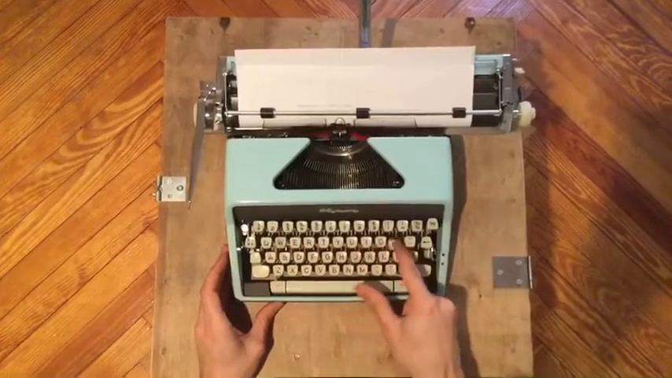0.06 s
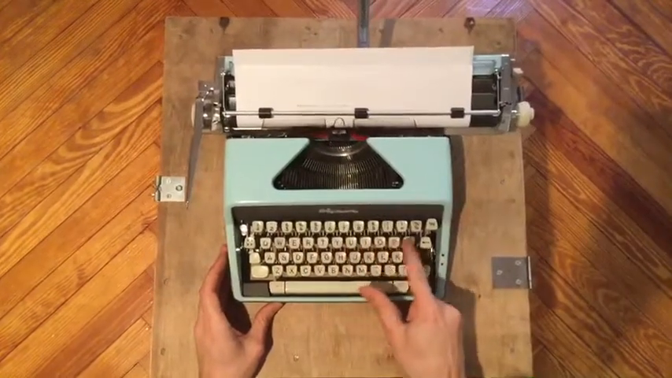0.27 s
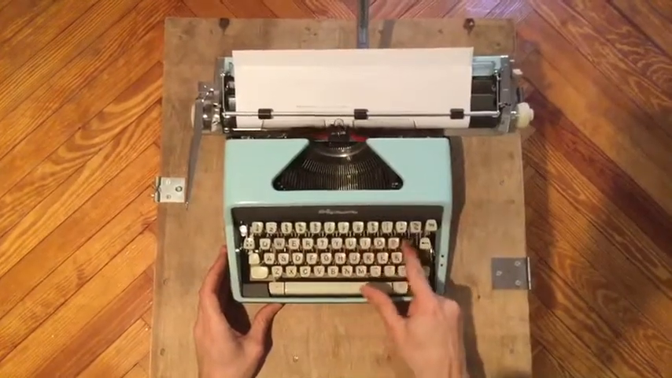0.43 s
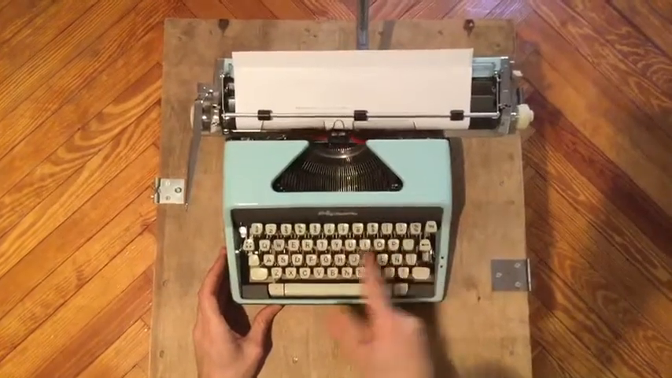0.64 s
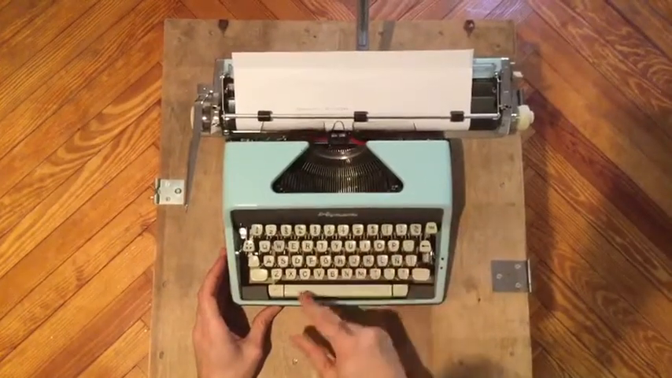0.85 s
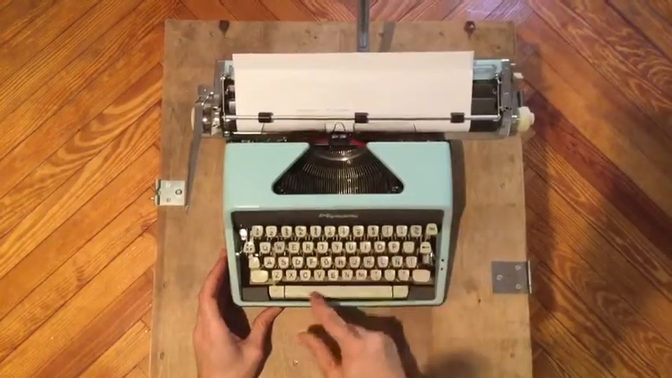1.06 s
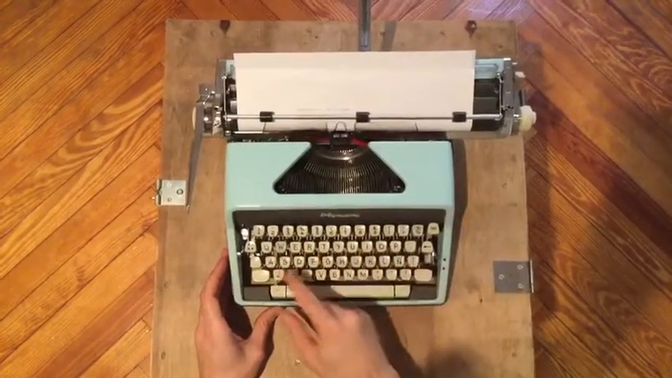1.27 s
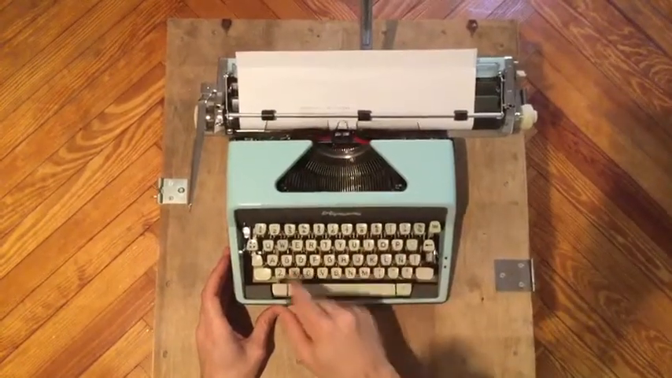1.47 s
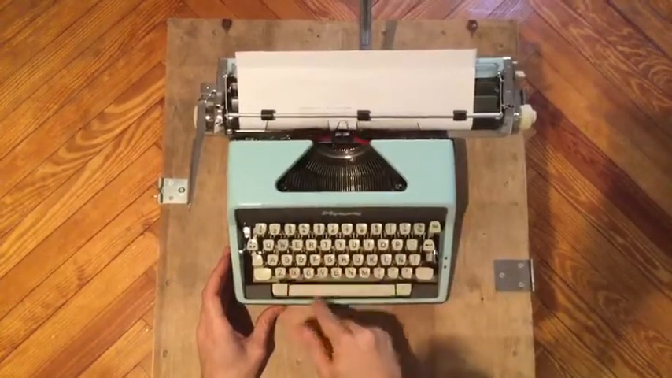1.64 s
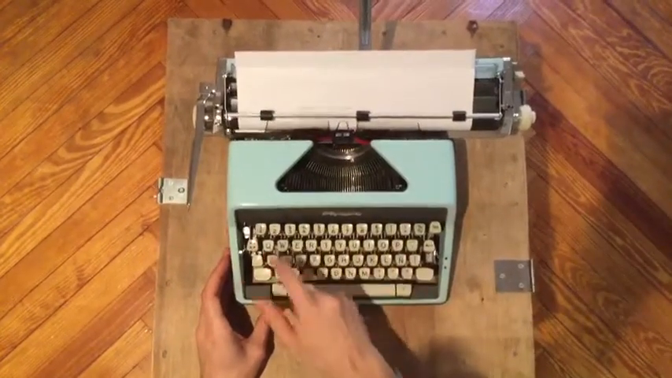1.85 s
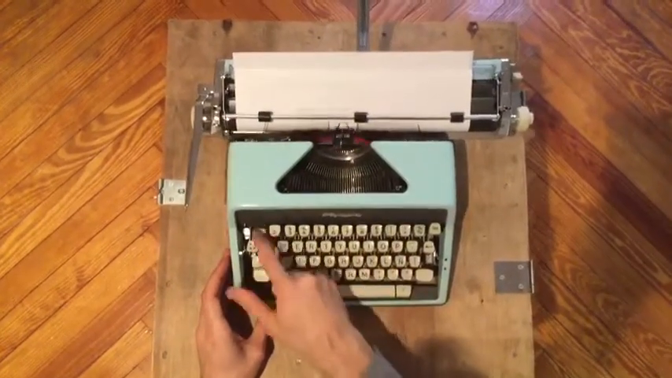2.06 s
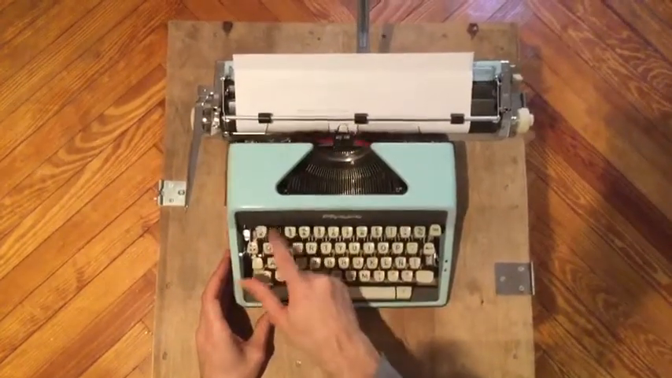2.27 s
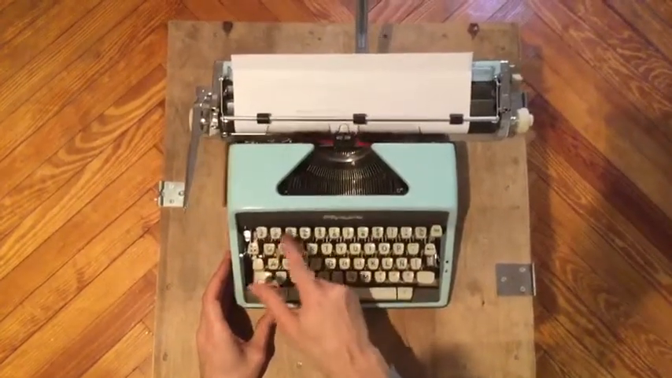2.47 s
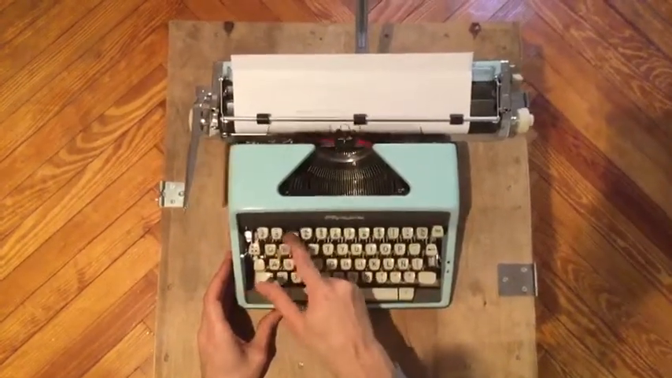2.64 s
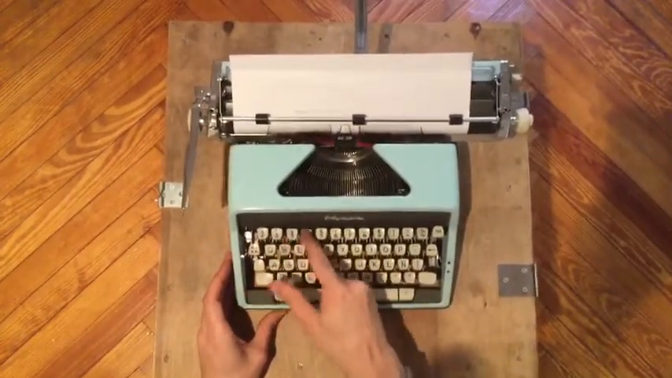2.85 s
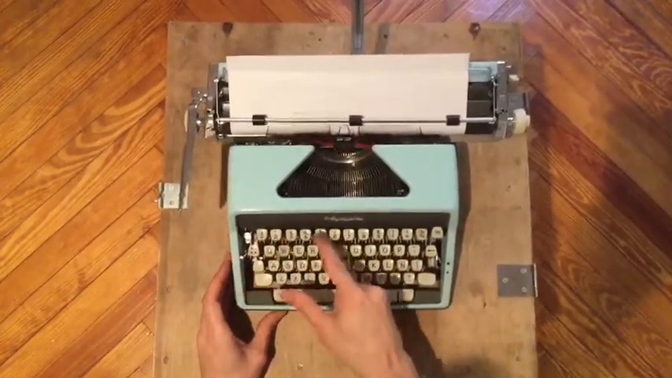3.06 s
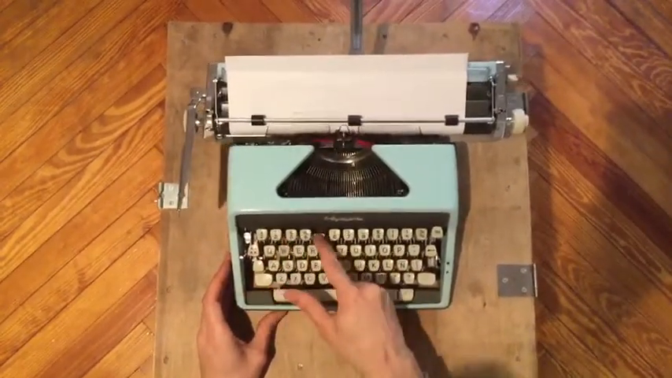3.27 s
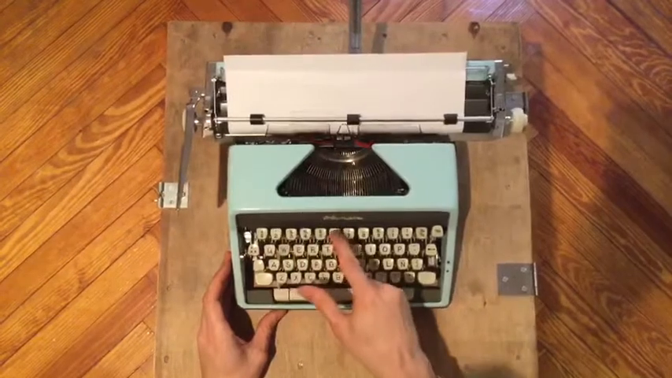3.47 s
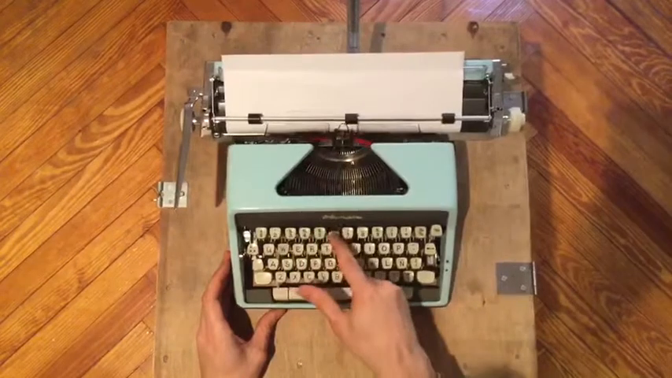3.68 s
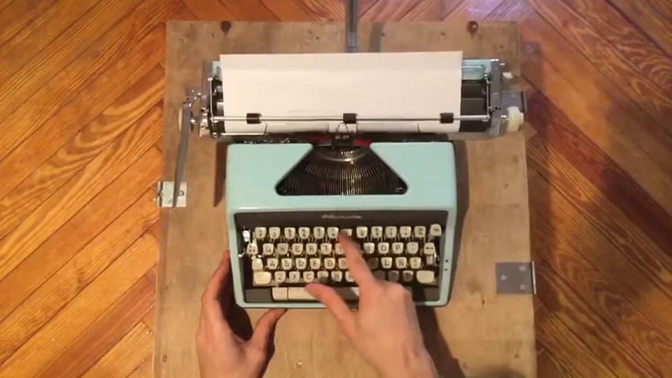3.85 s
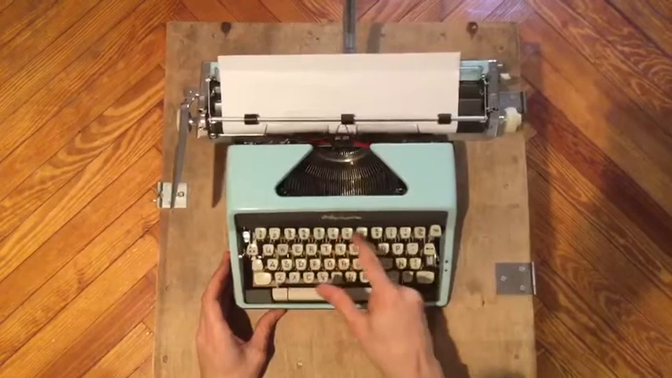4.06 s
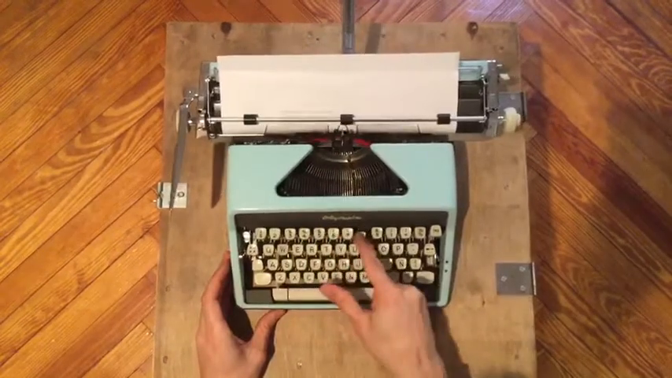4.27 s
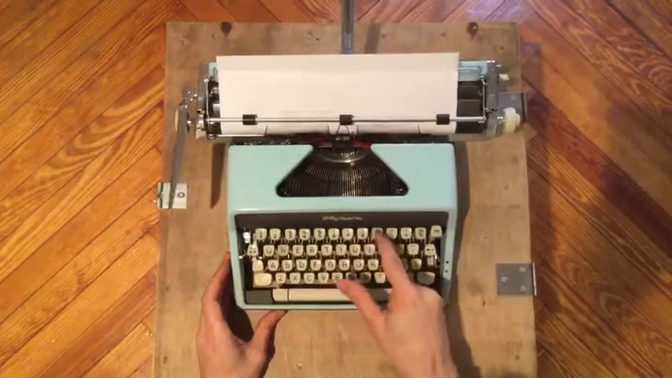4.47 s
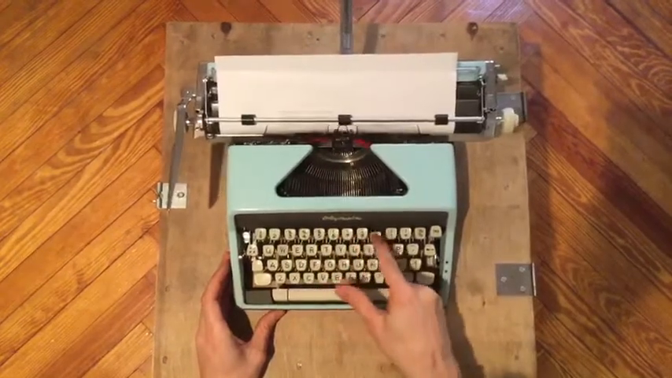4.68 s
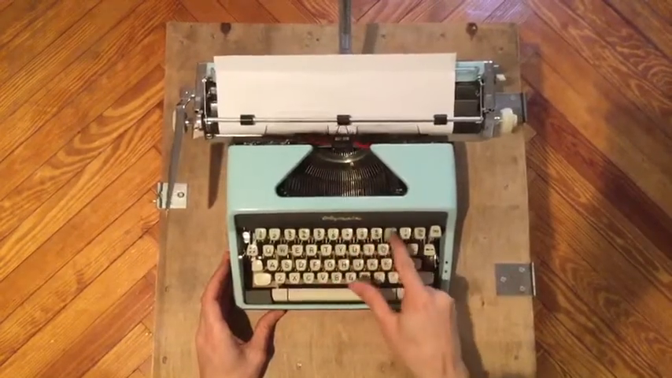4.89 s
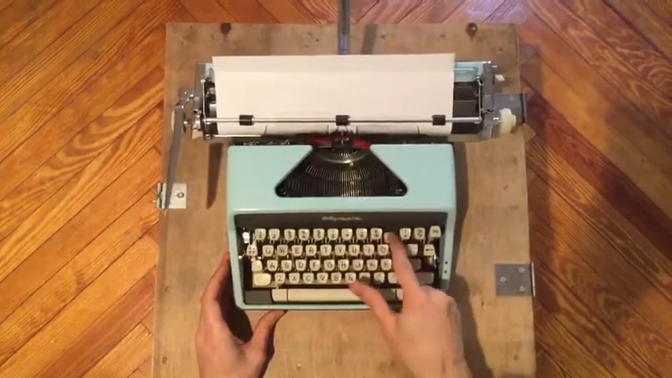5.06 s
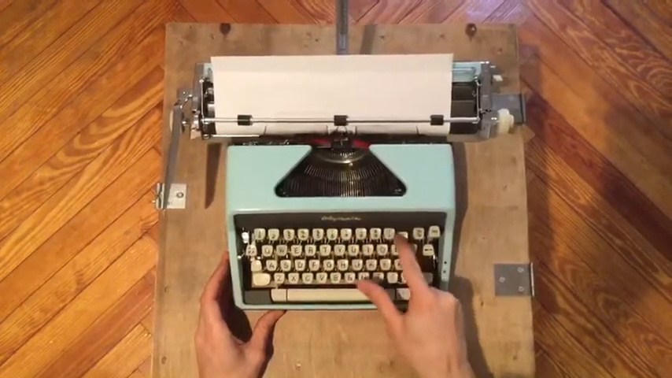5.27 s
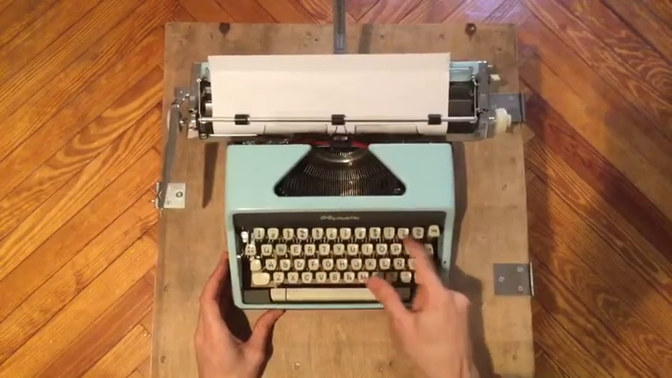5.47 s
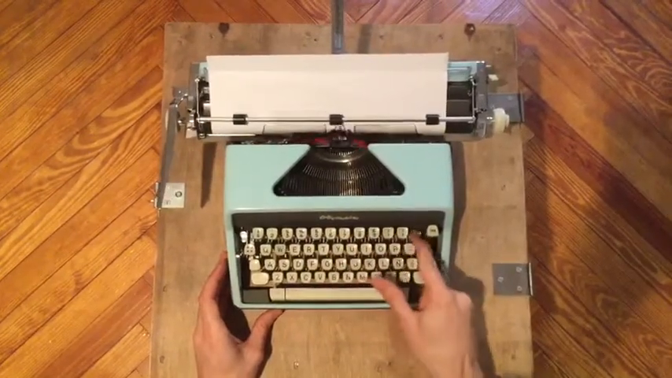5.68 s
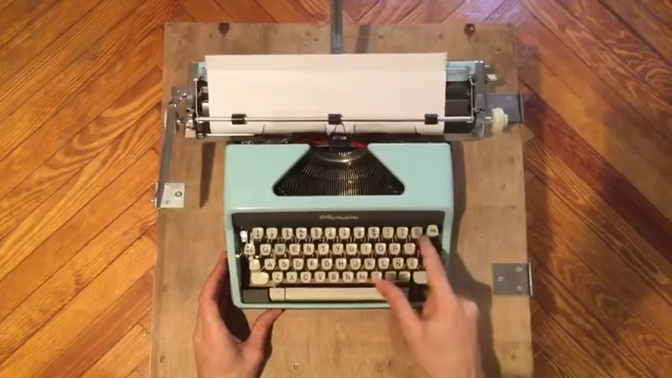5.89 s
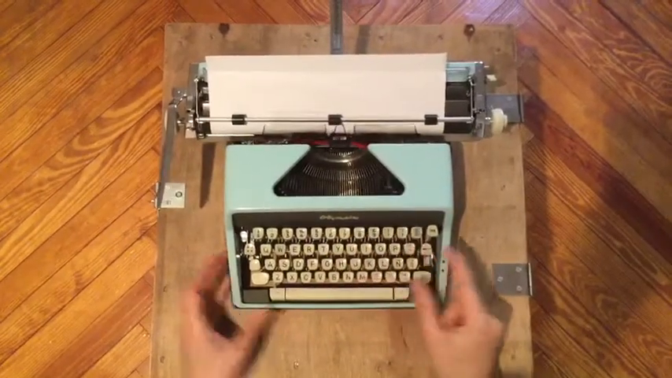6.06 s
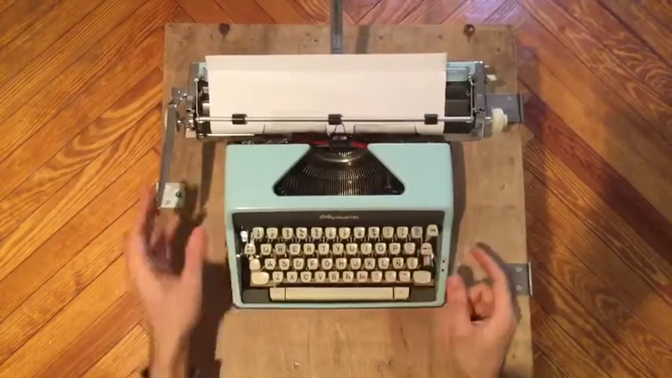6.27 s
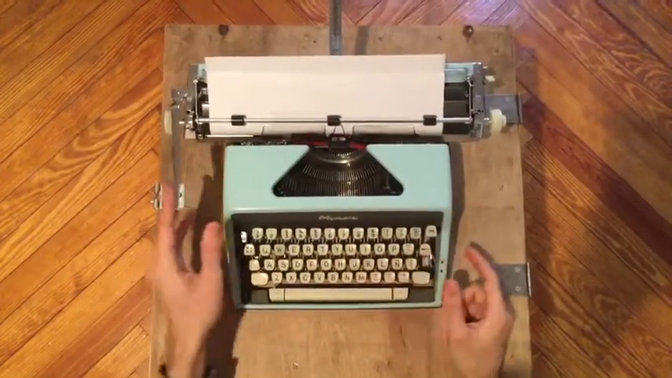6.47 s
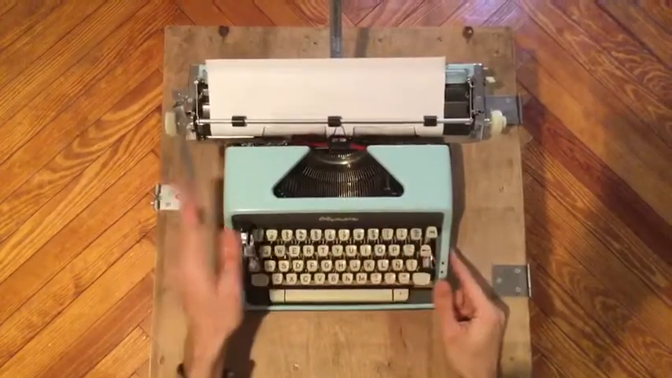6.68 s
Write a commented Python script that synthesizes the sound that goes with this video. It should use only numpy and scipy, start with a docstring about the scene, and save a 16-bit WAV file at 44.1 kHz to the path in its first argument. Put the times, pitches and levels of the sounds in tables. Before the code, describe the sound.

A small manual typewriter on a wooden board, close up in a quiet hard-floored room, over faint low room tone. A light key-release tick opens, then sharp slaps land at 0.1 and 0.45 s: dry, bright metal cracks with brief casing clatter and a low wooden thud. Soft release clicks and a padded knock follow until 0.7 s. After a pause, the space bar goes down at 1.63 s with a muted clack and snaps back around 1.75 s, with a tiny fingernail tick. From 2.1 to 5.74 s come twelve single strokes, spaced about 0.3 to 0.4 s, similarly loud but slightly varied in brightness. Each is preceded by a little linkage chatter and followed by the type bar dropping back with a click and hollow knock. The last return is near 5.98 s. Then near-silence, a barely audible touch at 6.33 s and a very faint rustle to the end.

```python
"""A quiet, hard-floored room: a portable typewriter on a wooden board, typed with one finger.
Each stroke scrapes and chatters in the steel linkage (shaped noise), then the type slaps the platen
(dying sines, a noise crack, a metallic ping and a casing clatter). The bar knocks on its padded rest
and the board booms: both are short banks of low sines. A space bar and a few fingernail snaps join in.
Sparse random reflections make the room tail, over steady room tone and a late, faint rustle."""
import sys
import numpy as np
from scipy import signal
from scipy.fft import rfft, irfft
from scipy.io import wavfile
from scipy.ndimage import uniform_filter1d

SR = 44100
rng = np.random.default_rng(int(sys.argv[2]) if len(sys.argv) > 2 else 0)


def persist_wave(psi):
    """Save psi, clipped to +-1, as 16-bit WAV."""
    counts = np.round(np.clip(psi, -1, 1) * 32767).astype(np.int16)
    wavfile.write(sys.argv[1], SR, np.atleast_2d(counts).T)


N = 296793  # length in samples

# Type hits paper and platen: start_s, level_db, treble_db (trims the modes over 8 kHz), casing_db and
# ping_db (both relative to the slap), early_s (key bottoms out this long before; negative is after),
# jolt_db, high_share (higher board modes, 0-1), rebound_db
TYPE_SLAPS = [(0.1107, -3, -15, -28.5, -26.5, 0.0052, -21.5, 0.72, -53),
              (0.4546, -5, -38, -25, -10, -0.0062, -23, 0.05, -32.5),
              (2.1063, -5.5, -18.5, -25, -12, 0.011, -22.5, 0.4, -27.5),
              (2.386, -3.5, -16, -23.5, -9, -0.0039, -26, 0.85, -33),
              (2.6667, -5, -22, -24.5, -33.5, 0.0074, -21, .59, -29.5),
              (2.9588, -5, -19, -24.5, -26.5, 0.012, -20, 0.16, -24),
              (3.2661, -5.5, -19.5, -26, -35, .011, -21, 0.6, -26),
              (3.644, -4.5, -22.5, -23.5, -56, 0.0071, -23, 0.7, -31),
              (3.9537, -5, -17.5, -26, -27, 0.016, -23.5, 0.4, -25.5),
              (4.293, -4.5, -21, -24, -34, .0086, -20.5, 0.37, -27),
              (4.6366, -5.5, -23.5, -25, -37, 0.0059, -21.5, 0.57, -32.5),
              (5.0067, -5.5, -36, -25.5, -12.5, 0.013, -25, .75, -30),
              (5.3649, -6, -23, -21.5, -17, 0.003, -26.5, 0.87, -30),
              (5.7382, -3.5, -17.5, -26.5, -22.5, -0.012, -27.5, 1, -36)]
# Platen resonances: pitch_hz, width_hz (wider dies sooner), level_db
PLATEN_MODES = [(596, 110, -12), (741, 130, -12.5), (1623, 74, -15.5), (2557, 228, 2.5), (3700, 200, -9.5),
                (4474, 204, 0), (5484, 190, -7), (6233, 220, -5.5), (8700, 920, -15), (8450, 160, -7),
                (10400, 210, -36), (10000, 170, -18.5), (14100, 370, -28)]
# Spectrum of the sheet-metal casing: pitch_hz, level_db (relative, per Hz)
CASING_SPECTRUM = [(410, -19), (700, -3), (886, -11.5), (1300, -9), (1400, -21), (1920, -8.5), (2350, -5),
                   (2650, 0.5), (3100, -4.5), (3740, -8.5), (4320, -11), (4860, -10), (6230, -8.5),
                   (9990, -26.5), (12500, -28.5), (15400, -39.5), (16000, -47)]
# Fade of the casing clatter: pitch_hz, t60_s
CASING_FADE = [(800, 0.27), (1800, 0.22), (2700, 0.36), (3600, 0.32), (7000, 0.27), (14000, 0.22)]


def slap(db, treble_db, casing_db, ping_db, *_):
    """The blow rings the platen with a short crack; the steel type pings and the casing clatters on."""
    hz, width_hz, mode_db = np.transpose(PLATEN_MODES)
    t = np.arange(12000) / SR
    detuned_hz = hz * rng.uniform(0.98, 1.015, len(hz))
    trimmed_db = mode_db + (hz > 8000) * (treble_db + 13)
    ring = rings(detuned_hz, 1.95 / width_hz, trimmed_db, size=len(t), spread_db=0.0)
    # ribbon and paper cushion the contact, so the force builds over half a millisecond
    rise = 1 - np.exp(-(t / 0.00047) ** 2)
    crack_tilt_db = 11.5 + 0.086 * (treble_db + 15)
    crack = gain_of(-19.0) * coloured(CASING_SPECTRUM, len(t), crack_tilt_db) * np.exp(-t / 0.0028)
    ping = gain_of(ping_db - 60 * t / 0.013) * np.sin(2 * np.pi * 13700 * t)
    grains = coloured(CASING_SPECTRUM, len(t)) * uneven(count=200, size=60, spread_db=3.5)
    clatter = gain_of(casing_db - 5) * dying(grains, CASING_FADE) * (1 - np.exp(-t / 0.001))
    hit = peaked(rise * (peaked(ring) + crack))
    return gain_of(db) * (hit + rise * ping + clatter)


# Spectrum of the steel linkage: pitch_hz, level_db (relative, per Hz)
LINKAGE_SPECTRUM = [(530, -22.5), (900, 3.5), (1700, 1), (2090, 1), (3960, -4), (4360, -4.5), (5410, -5),
                    (7490, -7), (14400, -6.5), (15400, -10.5), (16000, -41)]
GUIDE_S, SCRAPE_DB = 0.0135, -23  # run-up before the blow; level relative to the slap


def scrape(db, *_):
    """The ribbon fork jumps and the type bar scrapes into its guide, louder and louder up to the blow."""
    t = np.arange(3000) / SR - GUIDE_S  # the blow falls at zero
    approach = np.exp(t / 0.009) * np.clip((t + GUIDE_S) / 0.0024, 0, 1)
    shape = np.where(t < 0, approach, np.exp(-t / 0.012))
    grains = gain_of(2.1 * np.repeat(rng.standard_normal(100), 30))
    return gain_of(db + SCRAPE_DB) * coloured(LINKAGE_SPECTRUM, len(t), 3.0) * grains * shape


def tick(db, tilt_db, length_s):
    """Loose steel parts chatter: uneven grains build over a fraction of their length and die away."""
    t = np.arange(3000) / SR
    shape = (1 - np.exp(-t / (0.046 * length_s))) * np.exp(-t / length_s)
    grains = coloured(LINKAGE_SPECTRUM, len(t), tilt_db) * uneven(count=60, size=50, spread_db=4.0)
    return gain_of(db - 16.0) * grains * shape


# Lengths below are decay constants of the chatter; tilts are in dB per octave.
# Finger starts a key down: start_s, chatter_db, length_s, push_db (on the board)
KEY_PRESSES = [(0.07, -37.5, .036, -37.5), (0.416, -35.5, 0.012, -35), (2.061, -31, 0.047, -27.5),
               (2.345, -32.5, 0.039, -31.5), (2.623, -32.5, .031, -39.5), (2.914, -37, 0.049, -34),
               (3.219, -41, 0.058, -32), (3.604, -34.5, 0.079, -28.5), (3.918, -37.5, 0.044, -28),
               (4.248, -36, .036, -30), (4.591, -35.5, 0.03, -28), (4.964, -39.5, 0.017, -31),
               (5.322, -38.5, 0.022, -31), (5.6934, -33.5, 0.013, -34)]
PRESS_TILT_DB, PRESS_LAG_S = 3, 0.0046  # the lag delays knock and push
PRESS_KNOCK_DB = -7.5  # relative to the chatter setting
PRESS_KNOCK_HIGH, PRESS_BOARD_HIGH = 0.23, 0.085  # shares of the higher modes, 0-1
# Finger lets go, the escapement steps the carriage: start_s, chatter_db, length_s, knock_db, jolt_db
KEY_RELEASES = [(0.0034, -38, 0.0093, -43.5, -33.5), (0.2427, -32.5, .019, -38, -26.5),
                (0.6786, -38.5, 0.014, -47, -47), (2.24, -36, .012, -48.5, -32),
                (2.503, -30.5, 0.021, -42.5, -28), (2.785, -31, 0.028, -38.5, -28.5),
                (3.0844, -32.5, 0.03, -37.5, -28.5), (3.445, -36, 0.063, -38.5, -28),
                (3.795, -34, 0.063, -40, -29), (4.107, -34.5, 0.063, -39, -26.5),
                (4.448, -32, 0.037, -38, -26.5), (4.8005, -33, 0.041, -37.5, -28.5),
                (5.184, -30, 0.016, -41, -27.5), (5.539, -34.5, 0.028, -38.5, -28.5),
                (5.923, -33, 0.027, -40, -26.5)]
RELEASE_TILT_DB, RELEASE_KNOCK_S, RELEASE_JOLT_S = 1, 0.0036, 0.007  # tilt; delays of knock and jolt
RELEASE_KNOCK_HIGH, RELEASE_BOARD_HIGH = 1, 0.83  # shares of the higher modes, 0-1
# A lever catches with a thin click while the key travels: start_s, level_db
LEVER_CATCHES = [(2.36, -26), (2.6374, -28), (2.9296, -25.5), (3.236, -31), (3.6217, -23), (3.925, -32.5),
                 (4.9835, -26.5)]
CATCH_TILT_DB, CATCH_S = 6.5, 0.0016
# Loose parts take up slack: start_s, chatter_db
SLACK_TAKEUPS = [(2.266, -35.5), (3.423, -41.5), (4.782, -34.5), (5.165, -34.5), (5.5151, -35.5),
                 (5.909, -34)]
SLACK_TILT_DB, SLACK_S, SLACK_KNOCK_DB = 2.3, 0.014, -11  # knock relative to the chatter setting
# Space bar goes down in stages and snaps back; last a light touch on the machine:
# start_s, chatter_db, tilt_db_per_octave, length_s, knock_db, jolt_db, high_share (0-1)
SPACE_BAR = [(1.63, -28, 1, 0.0065, -45, -35, .5), (1.643, -30.5, 2.5, 0.013, -41, -23, 0.1),
             (1.67, -32, 0, 0.011, -45, -44.5, .6), (1.676, -49, 1.5, .01, -47.5, -28.5, .6),
             (1.7466, -27.5, 1, 0.023, -55, -44, 0.5), (1.755, -34, -4, 0.057, -32, -20, .95),
             (1.781, -54, .1, .01, -49, -25, .47), (6.327, -60, 4, .012, -51, -44.5, .45)]
SPACE_LAG_S = 0.003  # delay of its knock and jolt
RATTLE_LEAD_S, RATTLE_TILT_DB, RATTLE_S = 0.0027, 9.5, 0.011  # rattle just ahead of a bar landing


def ticks():
    """Rows (start_s, level_db, tilt_db, length_s) for every moment at which the linkage chatters."""
    return ([(s, db, PRESS_TILT_DB, length) for s, db, length, _ in KEY_PRESSES]
            + [(s, db, RELEASE_TILT_DB, length) for s, db, length, *_ in KEY_RELEASES]
            + [(s, db, CATCH_TILT_DB, CATCH_S) for s, db in LEVER_CATCHES]
            + [(s, db, SLACK_TILT_DB, SLACK_S) for s, db in SLACK_TAKEUPS]
            + [(s - RATTLE_LEAD_S, db, RATTLE_TILT_DB, RATTLE_S) for s, _, _, db, *_ in BAR_LANDINGS]
            + [(s, db, tilt, length) for s, db, tilt, length, *_ in SPACE_BAR])


# Resonances of the padded rest: pitch_hz, t60_s, level_db
REST_MODES = [(450, 0.07, -13), (563.4, 0.019, 7), (600, 0.05, -7), (700, .025, -10), (984, .008, -26)]


def knock(db, high):
    """A soft landing: a short hollow ring that swells over its first cycles."""
    hz, t60, mode_db = np.transpose(REST_MODES)
    lean_db = 40 * (high - 0.5) * np.log2(hz / 520)  # tips the balance towards low or high modes
    swell = 1 - np.exp(-(np.arange(5000) / SR / 0.0022) ** 2)
    ring = rings(hz * rng.uniform(0.97, 1.03), t60, mode_db + lean_db, size=5000)
    return gain_of(db + 1.5) * peaked(swell * ring)


# Type bar lands on its padded rest: start_s, knock_db, high_share (0-1), rattle_db, jolt_db, bounce_db
BAR_LANDINGS = [(0.029, -40, 0.46, -42, -45, -48.5), (0.295, -35.5, 0.9, -38, -57, -51),
                (0.693, -31, 0.62, -44, -35.5, -58.5), (2.556, -31, 0.47, -31.5, -40.5, -69),
                (2.834, -31, 0.86, -32, -30, -58), (3.13, -31.5, 0.5, -34, -30, -74),
                (3.502, -29, 0.7, -42, -33.5, -71), (3.848, -27.5, 0.8, -42, -28, -64),
                (4.154, -24.5, 0.96, -42, -30.5, -76), (4.49, -26, .9, -40, -34, -46.5),
                (4.839, -28, 0.5, -32.5, -31, -57.5), (5.226, -33, 0.74, -36, -37.5, -52.5),
                (5.603, -35, 0.96, -37, -39.5, -44.5), (5.976, -30.5, 0.53, -38, -35, -60)]
BOUNCE_S, BOUNCE_HIGH, LANDING_BOARD_HIGH = 0.043, 0.47, 0.57  # bounce delay; shares of higher modes
SLAP_KNOCK_DB, SLAP_KNOCK_HIGH = -31, 0.8  # the type's blow also shakes the rest


def knocks():
    """Rows (start_s, level_db, high_share) for every blow on the padded rest."""
    return ([(s + PRESS_LAG_S, db + PRESS_KNOCK_DB, PRESS_KNOCK_HIGH) for s, db, *_ in KEY_PRESSES]
            + [(s + RELEASE_KNOCK_S, db, RELEASE_KNOCK_HIGH) for s, _, _, db, _ in KEY_RELEASES]
            + [(s, db + SLAP_KNOCK_DB, SLAP_KNOCK_HIGH) for s, db, *_ in TYPE_SLAPS]
            + [(s, db + SLACK_KNOCK_DB, RELEASE_KNOCK_HIGH) for s, db in SLACK_TAKEUPS]
            + [(s, db, high) for s, db, high, *_ in BAR_LANDINGS]
            + [(s + BOUNCE_S, db, BOUNCE_HIGH) for s, *_, db in BAR_LANDINGS]
            + [(s + SPACE_LAG_S, db, high) for s, *_, db, _, high in SPACE_BAR])


# Low resonances of the wooden board: pitch_hz, t60_s, level_db
BOARD_MODES = [(62, 0.11, -27), (98, 0.045, -17), (120.5, 0.125, -5.5), (164.5, 0.18, -3.2),
               (190, 0.06, 0.5), (220, 0.11, -7.5), (258, .08, -10), (310, 0.07, -20), (377.7, 0.03, -15)]


def thud(db, high):
    """A push about two milliseconds long sets the board's low modes going."""
    hz, t60, mode_db = np.transpose(BOARD_MODES)
    lean_db = 16 * (high - 0.5) * np.log2(hz / 150)
    ring = rings(hz, t60, mode_db + lean_db, size=12000, spread_db=1.5)
    push = np.hanning(90)
    return gain_of(db) * peaked(np.convolve(push, ring))


REBOUND_S, REBOUND_HIGH = 0.044, 0.9  # delay after the key bottoms out; share of the higher modes


def thuds():
    """Rows (start_s, level_db, high_share) for every jolt that reaches the board."""
    return ([(s + PRESS_LAG_S, db, PRESS_BOARD_HIGH) for s, *_, db in KEY_PRESSES]
            + [(s - early, db, high) for s, *_, early, db, high, _ in TYPE_SLAPS]
            + [(s - early + REBOUND_S, db, REBOUND_HIGH) for s, *_, early, _, _, db in TYPE_SLAPS]
            + [(s + RELEASE_JOLT_S, db, RELEASE_BOARD_HIGH) for s, *_, db in KEY_RELEASES]
            + [(s, db, LANDING_BOARD_HIGH) for s, *_, db, _ in BAR_LANDINGS]
            + [(s + SPACE_LAG_S, db, high) for s, *_, db, high in SPACE_BAR])


# A fingernail meets a hard surface: start_s, level_db
NAIL_HITS = [(1.6288, -46.5), (1.7554, -46.5), (6.3286, -66.5)]
# Resonances of that snap: pitch_hz, t60_s, level_db
NAIL_MODES = [(1306, 0.0083, -1.5), (1930, 0.021, -1.5), (2280, 0.033, -5)]


def nail(db):
    """A dry little snap: three quickly dying sines."""
    return gain_of(db + 12.5) * peaked(rings(*np.transpose(NAIL_MODES), size=2000))


# Fade of the room tail: pitch_hz, t60_s
ROOM_FADE = [(125, 0.52), (500, 0.44), (2000, 0.42), (5000, 0.34), (10000, 0.34), (16000, 0.17)]


def room(x):
    """Sparse reflections of random sign, each band dying at its own speed."""
    taps = np.zeros(SR)
    at = np.arange(220, SR - 12, 12)  # first reflection after about 5 ms
    taps[at + rng.integers(0, 12, len(at))] = rng.choice([-1., 1.], len(at))
    tail = dying(taps, ROOM_FADE)
    return signal.fftconvolve(x, tail / np.linalg.norm(tail))[:N]


# Loudness of the rustle as the hand reaches the lever: start_s, level_db
RUSTLE_LEVEL = [(6.3, -93.5), (6.318, -90), (6.326, -77), (6.332, -74), (6.348, -76.5), (6.712, -72.5),
                (6.73, -68.5)]
# Its spectrum: pitch_hz, level_db (relative, per Hz)
RUSTLE_SPECTRUM = [(350, -30), (600, -3), (650, 2), (753, -10.5), (1280, -6), (1910, -2.5), (4830, -20),
                   (9000, -46.5), (11700, -62), (19800, -120)]


def rustle():
    """Skin and cuff brushing near the machine: noise in uneven strokes."""
    s, db = np.transpose(RUSTLE_LEVEL)
    strokes = uniform_filter1d(rng.standard_normal(N), 900)
    level_db = np.interp(np.arange(N) / SR, s, db, left=-140)
    return gain_of(level_db + 1.8 * strokes / strokes.std()) * coloured(RUSTLE_SPECTRUM, N)


# Spectrum of the room tone: pitch_hz, level_db (relative, per Hz)
AIR_SPECTRUM = [(15, -49.5), (25, -35.5), (30, -18.5), (43, 9.5), (102, -7), (114, -9), (145, 3),
                (180, -15), (217, -5), (249, -15.5), (285, -9.5), (416, -23.5), (4490, -41), (11900, -45.5),
                (16000, -53)]
AIR_DB = -59  # centre level of the room tone


def air():
    """Steady room tone: coloured noise with a slow swell."""
    swell = uniform_filter1d(rng.standard_normal(N), 6000)
    return gain_of(AIR_DB + 2.0 * swell / swell.std()) * coloured(AIR_SPECTRUM, N)


def gain_of(db):
    """Decibels to a factor."""
    return 10 ** (np.asarray(db) / 20)


def peaked(x):
    """Scales to peak 1."""
    return x / np.max(abs(x))


def read(points, hz):
    """Reads a table on a log-frequency axis."""
    f, value = np.transpose(points)
    return np.interp(np.log(hz + 1), np.log(f + 1), value)


def coloured(points, size, tilt_db=0):
    """Noise of rms 1 with a given spectrum, tilted by tilt_db per octave around 6 kHz."""
    hz = np.fft.rfftfreq(size, 1 / SR)
    spectrum_db = read(points, hz) + tilt_db * np.log2((hz + 50) / 6000)
    x = irfft(rfft(rng.standard_normal(size)) * gain_of(spectrum_db), size)
    return x / x.std()


def rings(hz, t60, db, size, spread_db=3.0):
    """A sum of dying sines of alternating sign; each blow weights them a little differently."""
    t = np.arange(size)[:, None] / SR
    sign = (-1) ** np.arange(len(hz))
    strength = sign * gain_of(db + spread_db * rng.standard_normal(len(hz)))
    fade = gain_of(-60 * t / np.maximum(t60, 0.001))
    return (strength * fade * np.sin(2 * np.pi * hz * t)).sum(1)


def dying(x, t60s):
    """Each band of x fades at its own speed."""
    hz, t, bands = signal.stft(x, SR, nperseg=256)
    fade = gain_of(-60 * t / read(t60s, hz)[:, None])
    return signal.istft(bands * fade, SR, nperseg=256)[1][:len(x)]


def uneven(count, size, spread_db):
    """Steps of random strength, a few of them large."""
    return gain_of(spread_db * np.repeat(np.minimum(rng.exponential(1, count), 3), size))


def add(mix, s, sound):
    """Mixes a sound in at s seconds."""
    part = mix[max(round(s * SR), 0):][:len(sound)]
    part += sound[:len(part)]


def played(rows, source, lead=0):
    """Plays every row of a table, started lead seconds ahead of its time."""
    mix = np.zeros(N)
    for s, *columns in rows:
        add(mix, s - lead, source(*columns))
    return mix


def scene():
    """Slaps, steel, rest and board each get their own room tail; rustle and room tone lie beneath."""
    slaps = played(TYPE_SLAPS, slap, lead=-0.0004)
    steel = played(ticks(), tick, lead=0.001)
    steel += played(TYPE_SLAPS, scrape, lead=GUIDE_S)
    steel += played(NAIL_HITS, nail)
    rest = played(knocks(), knock, lead=0.001)
    board = played(thuds(), thud, lead=0.002)
    wet = gain_of(-10.5) * room(slaps) + gain_of(-5.0) * room(steel)
    wet += gain_of(-7.5) * room(rest) + gain_of(-5.0) * room(board)
    return (slaps + steel + rest + board + wet + air() + rustle())[None]


DROOP_HZ, EDGE_HZ = 15500, 16400  # the treble drops steeply at the first, ends at the second


def record(dry):
    """The small microphone loses deep bass and the top of the treble; then the band limit."""
    thin = signal.sosfilt(signal.butter(2, 70., "high", fs=SR, output="sos"), dry)
    corners_hz = [0, DROOP_HZ - 200, DROOP_HZ + 200, EDGE_HZ - 150, EDGE_HZ + 150, SR / 2]
    taps = signal.firwin2(401, corners_hz, [1, 1, 0.05, 0.04, 0, 0], window=("kaiser", 9), fs=SR)
    return signal.oaconvolve(thin, taps[None], "same")


dry = scene()
out = record(dry)
persist_wave(out)
```